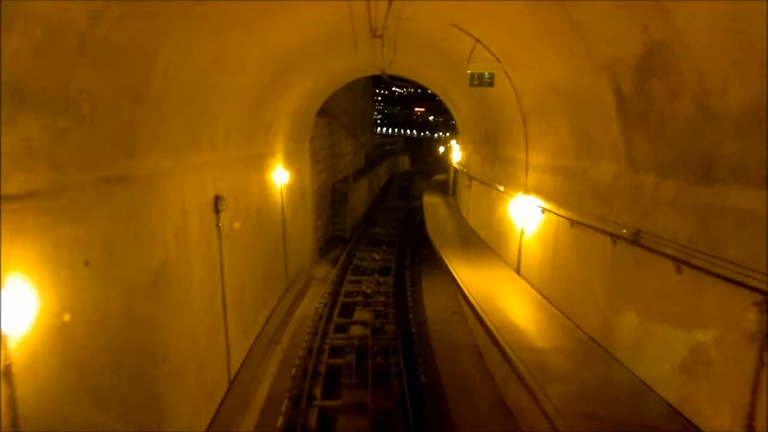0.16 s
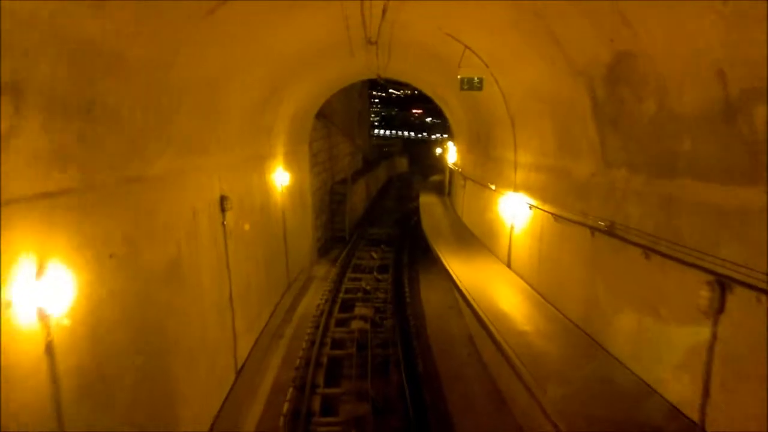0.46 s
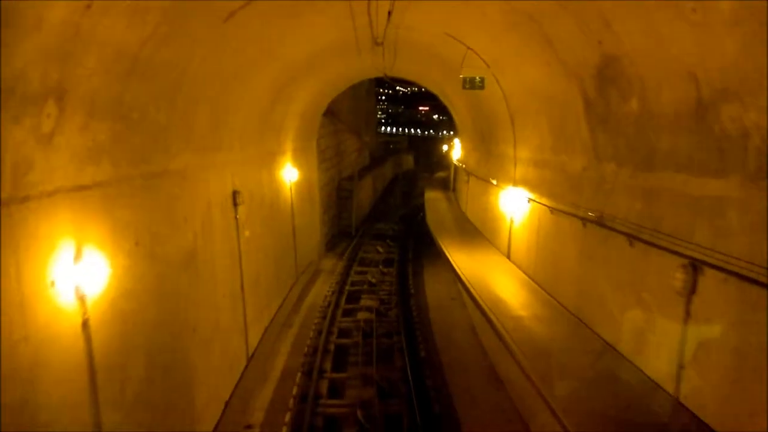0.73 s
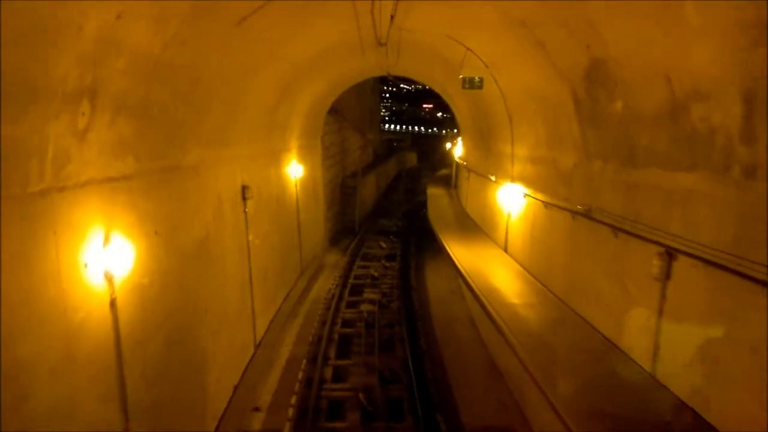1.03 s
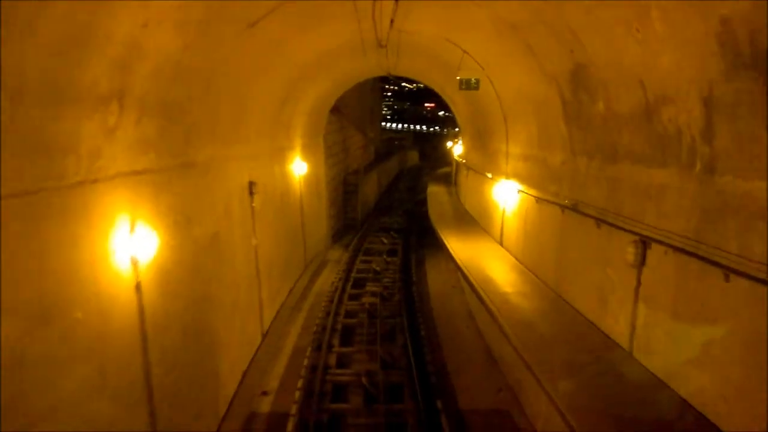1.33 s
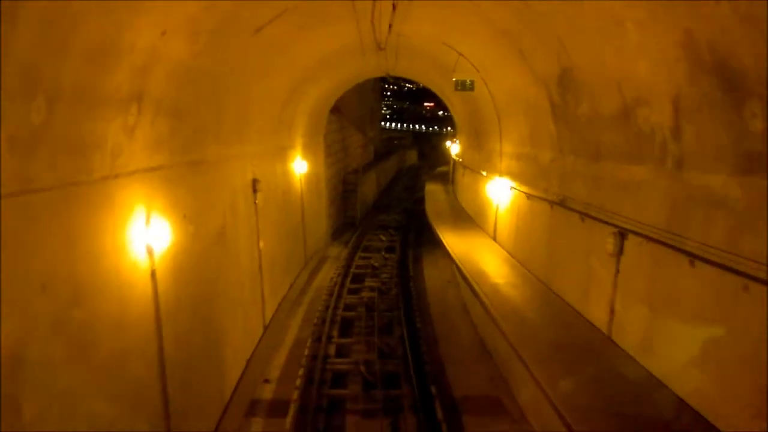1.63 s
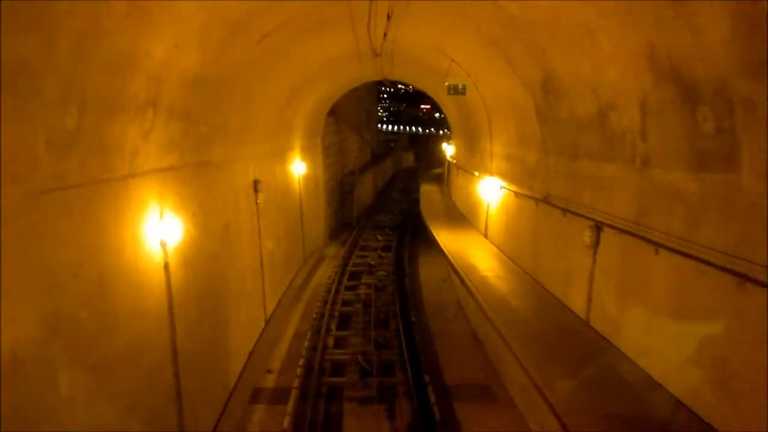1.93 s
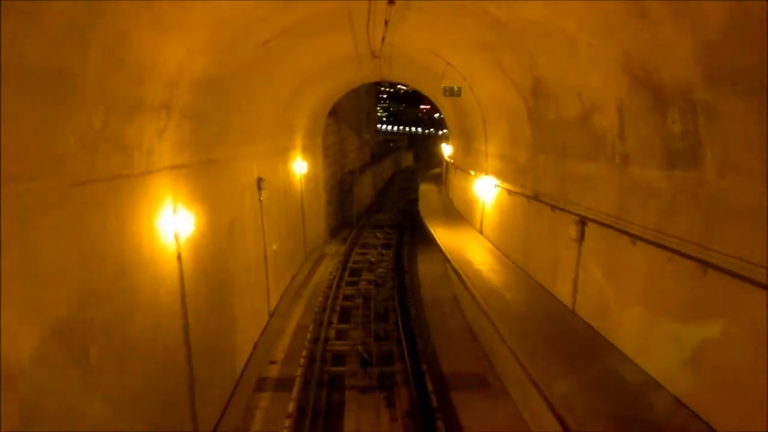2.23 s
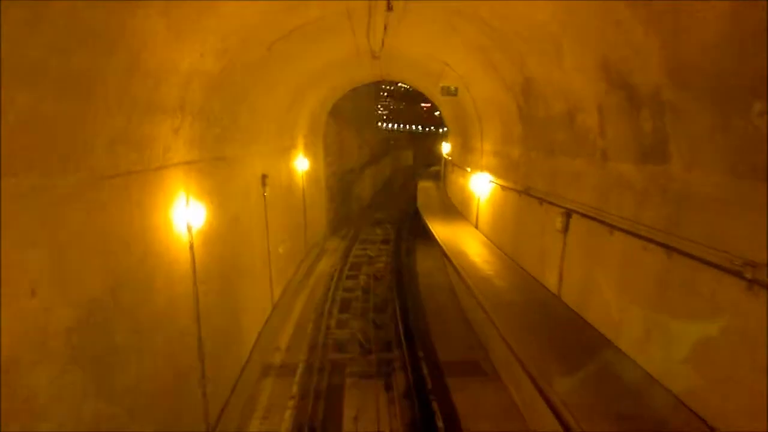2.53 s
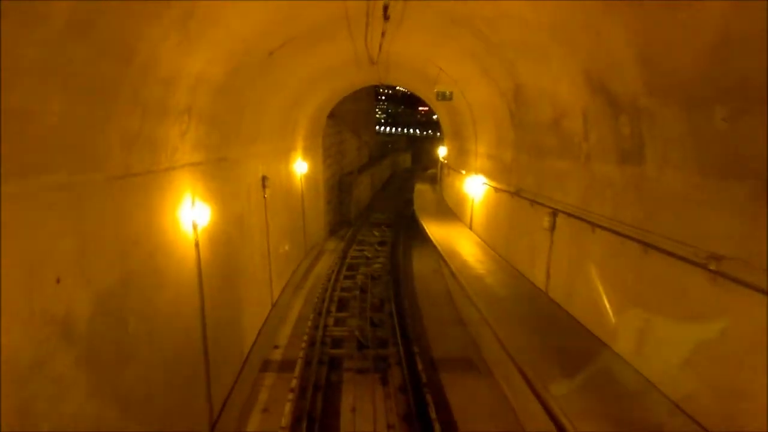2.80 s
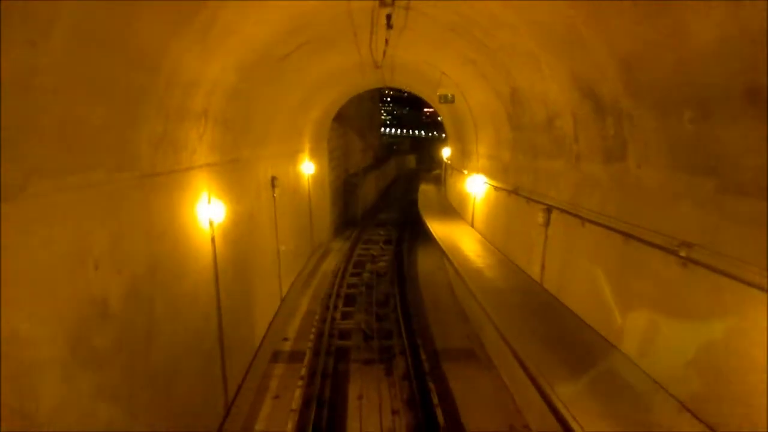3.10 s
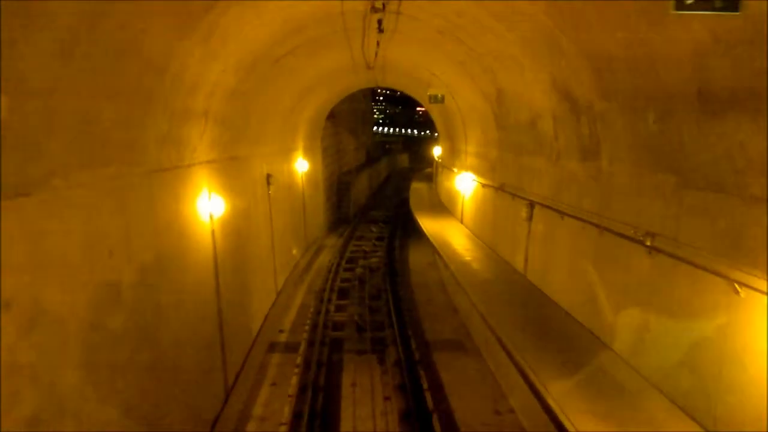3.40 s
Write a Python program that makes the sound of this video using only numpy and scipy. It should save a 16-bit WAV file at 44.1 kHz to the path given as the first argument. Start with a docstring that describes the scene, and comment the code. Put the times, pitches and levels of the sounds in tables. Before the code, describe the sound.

Inside a moving funicular car, a close stereo microphone picks up continuous bassy rumble, wavering body hum and uneven thuds of boom, under very faint hiss and whirr; loose metal clicks softly in the first half.

```python
"""Funicular car in a tunnel

Inside a funicular car rolling slowly through a tunnel. Rough rails shake the car body: it booms near
85 Hz and in other low modes (wavering tones), over a bed of rumble and panel roar (shaped noise).
Wheels and rope hiss above it, throbbing about three times a second, with a whirr near 2 kHz and
faint steady microphone hiss; a loose metal part clicks faintly: decaying partials and a noise wash."""
import sys
import numpy as np
from scipy import signal
from scipy.fft import rfft, irfft
from scipy.io import wavfile
from scipy.ndimage import uniform_filter1d

SR = 44100
rng = np.random.default_rng(int(sys.argv[2]) if len(sys.argv) > 2 else 0)


def generate_wav(signal):
    """Clip the signal to [-1, 1] and save it as 16-bit WAV at the path in sys.argv[1]."""
    frames = np.transpose(np.atleast_2d(signal))
    scaled = np.clip(frames, -1, 1) * 32767
    pcm = np.round(scaled).astype(np.int16)
    wavfile.write(sys.argv[1], SR, pcm)


N = 156555  # length in samples

# Spectra are relative (each bed is levelled afterwards); bed and mode levels are before any trim.
# Faint steady microphone hiss on top, spectrum: freq_hz, level_db_per_hz
MIC_HISS_SPECTRUM = [(2500, -40), (4500, -9), (6000, -0.5), (8000, -5), (10500, -8.5), (12500, -20),
                     (15000, -44)]
# Whirr near 2 kHz, level over time: time_s, level_db
WHIRR_LEVEL = [(0.02, -58), (0.24, -59.5), (0.26, -55), (0.43, -64.5), (0.61, -59), (1.19, -63.5),
               (1.7, -59.5), (2.29, -62.5), (2.65, -57), (2.67, -64), (2.85, -57), (2.97, -61),
               (3.02, -56.5), (3.14, -62), (3.53, -59.5)]
# Whirr, base spectrum: freq_hz, level_db_per_hz
WHIRR_SPECTRUM = [(1000, -57.5), (1900, -9.5), (2050, -9.5), (2330, -6), (2500, -20.5), (4000, -61)]
# Whirr, resonances: freq_hz, width_hz, level_db_per_hz
WHIRR_RESONANCES = [(2064.6, 26, 9.4), (2174, 30, 3), (2210, 220, 1.1)]
# Hiss of wheels and rope, throbbing level: time_s, level_db
HISS_THROB = [(0.02, -58), (0.1, -56.5), (0.28, -61.5), (0.33, -56.5), (0.41, -59.5), (0.63, -58.5),
              (0.66, -55.5), (0.85, -61.5), (0.92, -57), (0.99, -59), (1.25, -61.5), (1.28, -56),
              (1.4, -59.5), (1.62, -58.5), (1.7, -61), (1.74, -58), (2.15, -60.5), (2.36, -57.5),
              (2.39, -61), (2.52, -57), (3.15, -59.5), (3.16, -57), (3.27, -61), (3.31, -57), (3.48, -61),
              (3.53, -59.5)]
# Hiss, base spectrum: freq_hz, level_db_per_hz
HISS_SPECTRUM = [(800, -54.5), (1500, -24), (2400, -10.5), (2600, -4.5), (3000, -2), (4000, -1.5),
                 (4700, -7.5), (5500, -14), (5900, -30.5), (7000, -52.5), (9000, -71.5)]
# Hiss, resonances: freq_hz, width_hz, level_db_per_hz
HISS_RESONANCES = [(2757, 39, 4.5)]
# Clicks: start_s, ring_db, wash_db, wash_rise_s (both levels before the fades and the pan)
CLICK_EVENTS = [(0.6435, -58.5, -57.5, 0.0071), (0.6628, -68, -61.5, 0.0077), (1.305, -65, -62.5, 0.046)]
# Partials of the loose metal part: freq_hz, level_db (relative), t60_s
LOOSE_PART = [(4250, -4, .05), (5350, 3, .08), (6620, -4, .06), (7687, -11, .03), (9800, -13, .025)]
# Broad wash after each click, relative spectrum: freq_hz, level_db_per_hz
WASH_SPECTRUM = [(2500, -23), (4100, 4), (5300, -11), (6500, 3), (8000, -12.5), (10000, -18), (12000, -31)]
# Rolling roar, swell: time_s, level_db
ROAR_LEVEL = [(0.02, -42), (0.17, -43.5), (0.19, -42), (0.32, -44), (1.07, -44.5), (1.11, -46), (1.72, -42),
              (2.17, -45), (2.7, -40.5), (2.75, -42.5), (3.53, -43)]
# Roar, base spectrum: freq_hz, level_db_per_hz
ROAR_SPECTRUM = [(200, -70), (330, -28.5), (420, -6), (650, -8.5), (1000, -16), (1400, -18.5), (1550, -22),
                 (1900, -23), (2600, -51.5), (4000, -89)]
# Panel resonances in the roar: freq_hz, width_hz, level_db_per_hz
PANEL_RESONANCES = [(440.6, 22, 0), (491.6, 20, -1), (513.7, 20, 0.5), (577, 17, -6), (723, 17, -6),
                    (759, 33, -6), (878.4, 34, -4.5), (965, 21, -7), (1256, 60, -12.5), (1718, 33, -15.5)]
# Rumble, swell: time_s, level_db
RUMBLE_LEVEL = [(0.02, -34.5), (1.3, -36.5), (2.0, -32), (3.53, -34)]
# Rumble between the resonances, base spectrum: freq_hz, level_db_per_hz
RUMBLE_SPECTRUM = [(18, -23), (33, -26), (45, -17.5), (70, -16.5), (110, -20), (138, -17.5), (165, -25.5),
                   (240, -20), (290, -27.5), (330, -26), (400, -37.5), (480, -56.5), (700, -110)]
# Resonances of the car body in the rumble: freq_hz, width_hz, level_db_per_hz
BODY_RESONANCES = [(181, 14, -17.5), (342, 16, -27.5), (384.75, 8.2, -19.5)]
# Thin hum of a panel: time_s, level_db
PANEL_HUM = [(0.02, -64), (0.39, -61), (0.59, -44), (0.62, -62), (0.73, -58.5), (2.08, -59), (2.11, -52),
             (2.23, -63), (2.28, -46), (2.34, -58), (2.52, -52), (2.54, -52), (2.73, -51), (2.84, -65),
             (2.91, -45.5), (3.1, -64), (3.13, -51), (3.53, -56.5)]
# Body mode near 320 Hz: time_s, level_db, pitch_hz
RING_MODE = [(0.02, -38.5, 317.9), (0.08, -41.5, 319.3), (0.17, -54, 318.2), (0.22, -34, 313.2),
             (0.35, -46, 309.0), (0.43, -36.5, 318.1), (0.64, -43.5, 312.4), (1.08, -43, 315.9),
             (1.28, -44, 308.1), (1.3, -60, 307.5), (1.36, -46.5, 321.0), (1.57, -39.5, 317.9),
             (1.81, -50.5, 328.0), (1.98, -42.5, 319.3), (2.16, -49.5, 322.7), (2.89, -38.5, 317.5),
             (3.06, -45, 324.1), (3.13, -45, 312.3), (3.39, -45, 310.8), (3.53, -38, 318.8)]
# Body mode near 250 Hz: time_s, level_db, pitch_hz
GROAN_MODE = [(0.02, -41.5, 256), (0.26, -40.5, 242.5), (0.43, -41, 260), (0.5, -39.5, 241.5),
              (1.09, -47.5, 256.4), (1.14, -44, 237.5), (1.48, -43.5, 260.5), (1.7, -46.5, 240.9),
              (1.88, -35.5, 259.4), (2.02, -42, 243.1), (2.59, -39.5, 248.8), (2.65, -40.5, 267),
              (2.86, -40.5, 238.7), (2.91, -36.5, 254.8), (3.47, -39.5, 256.6), (3.53, -52, 252.6)]
# Body mode near 220 Hz: time_s, level_db, pitch_hz
MOAN_MODE = [(0.02, -44, 227.3), (0.25, -35.5, 229), (0.35, -41, 217.2), (0.52, -38.5, 216.4),
             (0.73, -42.5, 228.0), (1.08, -38.5, 218.9), (1.15, -40, 227.4), (1.22, -45, 215.3),
             (1.48, -31, 216.1), (1.72, -53, 222.8), (1.75, -35, 218.1), (2.45, -42, 215.7),
             (2.57, -36.5, 226.2), (2.85, -49, 229.7), (2.96, -49, 218), (3.07, -37, 219),
             (3.16, -41, 213.6), (3.28, -32, 221.7), (3.46, -52, 212.4), (3.53, -44.5, 222.6)]
# Body mode above the boom: time_s, level_db, pitch_hz
DRONE_MODE = [(0.02, -32.5, 132.3), (0.15, -37, 130.2), (0.57, -42.5, 141.4), (0.61, -30.5, 137.7),
              (0.94, -39.5, 130.4), (1.14, -45.5, 132.5), (1.39, -51, 144.6), (1.52, -28.5, 133.6),
              (1.63, -44.5, 134.3), (1.76, -36.5, 142.5), (1.85, -33, 130.1), (2.05, -41, 143.1),
              (2.18, -41, 131.5), (2.34, -38, 147.5), (2.44, -39.5, 127.7), (2.61, -31, 139.3),
              (2.79, -55, 124.4), (2.93, -47, 126.6), (3.03, -38, 139.6), (3.53, -38.5, 129.4)]
# Deeper mode under the boom: time_s, level_db, pitch_hz
DEEP_MODE = [(0.02, -42.5, 50.4), (0.2, -29.5, 57.5), (0.32, -41, 57.6), (0.37, -28, 61.3),
             (0.43, -52, 69.1), (0.47, -39, 66.7), (0.53, -36, 60.53), (0.62, -21.5, 59),
             (0.72, -26.5, 50.7), (0.81, -47, 50.5), (0.87, -24.5, 52.3), (0.91, -36, 50.8),
             (1.01, -39.5, 47.43), (1.34, -37, 48.8), (1.38, -42, 47.7), (1.49, -32, 55.73),
             (1.69, -45.5, 55.97), (1.75, -30.5, 56.2), (1.84, -39, 61.7), (1.91, -37, 59),
             (2.06, -32, 54.17), (2.37, -41, 54.6), (2.47, -47, 52.5), (2.57, -35, 47.4), (3.04, -30, 47.8),
             (3.14, -36, 54.35), (3.39, -49, 56.22), (3.53, -29, 55.83)]
# Boom of the car's lowest strong mode: time_s, level_db, pitch_hz
BOOM_MODE = [(0.02, -37, 87.2), (0.07, -28, 86.6), (0.15, -33.5, 94.5), (0.2, -20, 87.8),
             (0.27, -39.5, 83.5), (0.33, -23, 83.7), (0.42, -37, 84.8), (0.46, -24, 79.4), (0.5, -54, 78.3),
             (0.55, -38, 83.9), (0.6, -15.5, 82.8), (0.67, -42, 86.8), (0.74, -22.5, 89.1),
             (0.77, -38.5, 88.5), (0.9, -27, 88.16), (0.94, -37, 88.3), (1.03, -22, 88.3),
             (1.18, -31, 86.5), (1.25, -35, 86.95), (1.33, -41, 84.6), (1.36, -32.5, 86),
             (1.5, -35.5, 85.7), (1.58, -35, 86.5), (1.69, -40.5, 85), (1.75, -22.5, 84.7),
             (1.8, -33.5, 84.74), (1.86, -22.5, 86.94), (1.94, -32.5, 87.54), (2.02, -26, 83.2),
             (2.06, -47, 81.3), (2.09, -30.5, 78.7), (2.15, -44.5, 72.3), (2.21, -32, 78.2),
             (2.3, -56, 75.7), (2.38, -47, 83.3), (2.45, -62, 78.25), (2.53, -31, 80), (2.62, -42.5, 78.4),
             (2.65, -29, 79.7), (2.77, -42.5, 87.4), (2.83, -26.5, 80.3), (2.88, -32, 74.3),
             (2.92, -24.5, 76.2), (3.0, -48, 76.9), (3.11, -42, 79.56), (3.17, -18.5, 88.6),
             (3.28, -26, 88.4), (3.35, -30.5, 84.04), (3.53, -24, 83.9)]
# Left-right likeness of the noise beds: freq_hz, likeness (0 to 1)
LIKENESS = [(40, 0.72), (90, 0.98), (300, 0.99), (430, 0.96), (620, 0.72), (830, 0.79), (1100, 0.64),
            (1400, 0.58), (2500, 0.068), (9000, .05)]
# Stereo balance of beds and modes: freq_hz, left_minus_right_db
BALANCE = [(40, -4), (130, -4.5), (260, -3.5), (700, -.5), (830, -3), (1250, 0.5), (1650, 1.5),
           (2250, -8.5), (3200, -3), (5200, 2.5), (7300, 9.5), (10000, 9)]
# Stereo phase of beds and modes: freq_hz, left_lead_rad
LEFT_LEAD = [(40, -.1), (400, -.08), (1000, -.35), (1400, -.7), (1700, -2), (3000, -2.4)]

PANEL_HUM_HZ = 934
WASH_T60_S = 0.3


def amp(db):
    """Decibels to linear gain."""
    return 10 ** (np.asarray(db) / 20)


def evened(x):
    """Scale a signal to an rms of one."""
    return x / np.sqrt(np.mean(abs(x) ** 2) + 1e-20)


def read(points, hz):
    """Read a frequency table, interpolating along log frequency."""
    freq, value = np.transpose(points)
    return np.interp(np.log(hz + 1), np.log(freq + 1), value)


def curve(rows, column=1):
    """Draw one column of a time table as a line through every sample."""
    rows = np.array(rows)
    return np.interp(np.arange(N) / SR, rows[:, 0], rows[:, column])


def slow(hz):
    """Complex noise smoothed to a given bandwidth, unit rms."""
    noise = rng.standard_normal(N) + 1j * rng.standard_normal(N)
    lowpass = 1 / (1 + (np.fft.fftfreq(N, 1 / SR) / hz) ** 2)
    return evened(np.fft.ifft(np.fft.fft(noise) * lowpass))


def field(base, peaks, size, patchy_db, patch_hz, patch_s):
    """Stereo noise: a base spectrum plus resonances, broken into drifting patches."""
    hop = size // 4
    frames = N // hop + 5
    hz = np.fft.rfftfreq(size, 1 / SR)
    a, b, c, d, patch = rng.standard_normal((frames, len(hz), 5)).T

    # smooth the patches along frequency, then along time
    patch = uniform_filter1d(patch, max(1, round(patch_hz * size / SR)), 0)
    patch = evened(uniform_filter1d(patch, max(1, round(patch_s * SR / hop)), 1))

    power = amp(read(base, hz)) ** 2
    for freq, width, db in peaks:
        power = power + amp(db) ** 2 / (1 + (2 * (hz - freq) / width) ** 2) ** 2

    # the right side shares part of the left's noise; the rest is its own
    same = np.clip(read(LIKENESS, hz), 0, 1)[:, None]
    first, second = a + 1j * b, c + 1j * d
    tilt = np.exp(1j * read(LEFT_LEAD, hz)) * amp(read(BALANCE, hz))
    left = first * tilt[:, None]
    right = same * first + np.sqrt(1 - same ** 2) * second

    bins = np.array([left, right]) * np.sqrt(power)[:, None] * amp(patchy_db * patch)
    out = signal.istft(bins, nperseg=size, noverlap=size - hop)[1][:, :N]
    return out / np.std(out.mean(0))  # unit level in the mono sum


def mic_hiss():
    """Faint steady microphone hiss on top: patchy high noise held at one level."""
    return amp(-78) * field(MIC_HISS_SPECTRUM, [], size=1024, patchy_db=2.0, patch_hz=2556, patch_s=.04)


def whirr():
    """Whirr under the hiss: noise gathered into resonances near 2 kHz, rising and falling."""
    bed = field(WHIRR_SPECTRUM, WHIRR_RESONANCES, size=2048, patchy_db=0.3, patch_hz=300, patch_s=.06)
    return amp(curve(WHIRR_LEVEL) + 0.63) * bed


def hiss():
    """Wheels and rope: broad noise around 3 to 4 kHz whose level throbs."""
    bed = field(HISS_SPECTRUM, HISS_RESONANCES, size=2048, patchy_db=1.5, patch_hz=500, patch_s=0.036)
    return amp(curve(HISS_THROB)) * bed


def clicks():
    """Each click rings the loose part's partials briefly and leaves a broad wash in the cabin."""
    t = np.arange(SR // 3) / SR
    out = np.zeros((2, N + SR))  # spare room for the last tail
    ring = np.zeros(len(t))
    for hz, db, t60 in LOOSE_PART:
        ring += amp(db - 60 * t / t60) * np.sin(2 * np.pi * hz * t)
    ring *= np.minimum(t / 0.0015, 1)  # 1.5 ms attack

    colour = amp(read(WASH_SPECTRUM, np.fft.rfftfreq(len(t), 1 / SR)))
    for start, ring_db, wash_db, rise in CLICK_EVENTS:
        noise = rng.standard_normal((2, len(t)))
        wash = evened(irfft(rfft(noise) * colour, len(t)))
        wash = wash * amp(wash_db - 60 * t / WASH_T60_S) * np.minimum(t / rise, 1)
        at = round(start * SR)
        out[:, at:at + len(t)] += amp(ring_db) * ring + wash
    return out[:, :N] * amp([[-0.5], [0.5]])  # a touch to the right


def roar():
    """Rolling roar: rail roughness drives the panels, heard as noise with panel resonances."""
    bed = field(ROAR_SPECTRUM, PANEL_RESONANCES, size=4096, patchy_db=0.5, patch_hz=202, patch_s=.1)
    return amp(curve(ROAR_LEVEL) + 0.5) * bed


def rumble():
    """Rail roughness shakes the car: low noise ringing in the body resonances."""
    bed = field(RUMBLE_SPECTRUM, BODY_RESONANCES, size=4096, patchy_db=0.34, patch_hz=60, patch_s=0.16)
    return amp(curve(RUMBLE_LEVEL) + 1.5) * bed


def mode(rows, trim_db, fuzz):
    """One body mode, shaken into bursts: a wavering tone with a fuzzy skirt of noise."""
    pitch = curve(rows, column=2) + 2.49 * slow(6.9).real  # random waver, about 1.8 Hz rms
    turn = 2 * np.pi * np.cumsum(pitch) / SR
    skirt = 1 + fuzz * slow(13)
    tone = np.sqrt(2) * skirt * np.exp(1j * turn) * amp(curve(rows) + trim_db)

    # stereo placement is taken at the mode's first pitch
    half_lean = read(BALANCE, rows[0][2]) / 2
    lead = read(LEFT_LEAD, rows[0][2])
    left = tone * amp(half_lean) * np.exp(1j * lead)
    right = tone * amp(-half_lean)
    return np.array([left.real, right.real])


def upper_modes():
    """Body modes above the boom, plus the thin panel hum held around one pitch."""
    hum = [(s, db, PANEL_HUM_HZ) for s, db in PANEL_HUM]
    voices = [DRONE_MODE, MOAN_MODE, GROAN_MODE, RING_MODE, hum]
    return sum(mode(rows, trim_db=-2.5, fuzz=.45) for rows in voices)


def boom():
    """The car's lowest strong mode near 85 Hz, with a deeper mode under it."""
    return mode(BOOM_MODE, trim_db=0, fuzz=.25) + mode(DEEP_MODE, trim_db=-2, fuzz=.4)


def scene():
    """Mix the modes of the car, the noise beds and the clicks."""
    upper = upper_modes()
    body = boom() + upper + rumble() + roar()
    return body + hiss() + whirr() + mic_hiss() + clicks()


def record(dry):
    """Band limit: a steep linear-phase low-pass at 15.1 kHz."""
    lowpass = signal.firwin(511, 15100, window=("kaiser", 9), fs=SR)
    return signal.oaconvolve(dry, lowpass[None], "same")


dry = scene()
out = record(dry)
generate_wav(out)
```